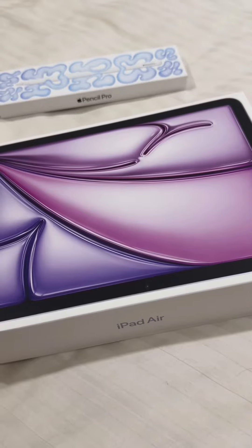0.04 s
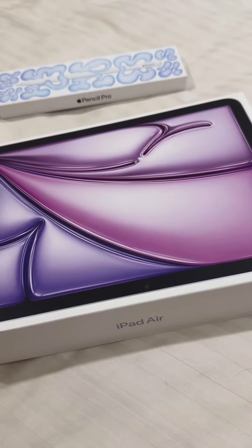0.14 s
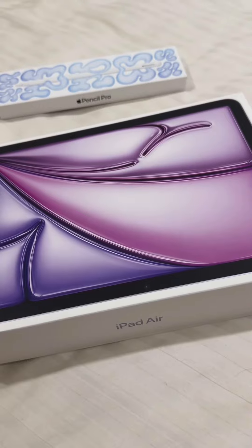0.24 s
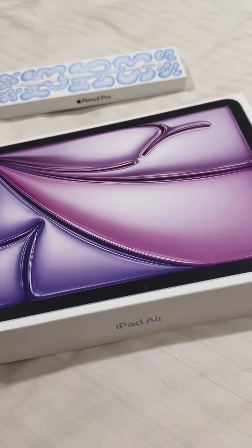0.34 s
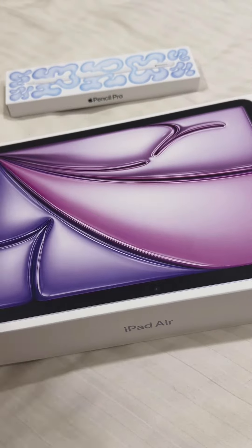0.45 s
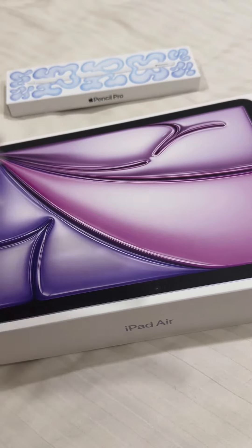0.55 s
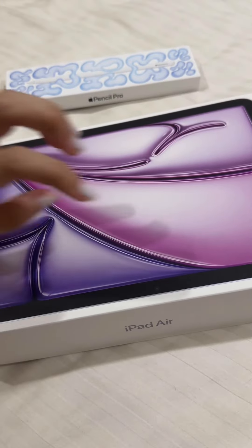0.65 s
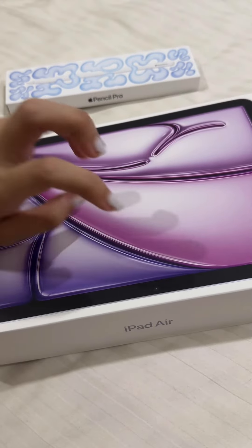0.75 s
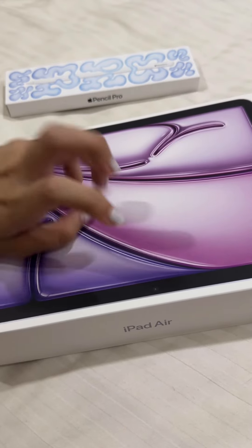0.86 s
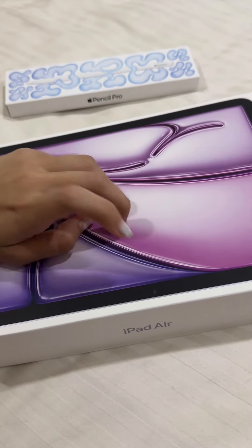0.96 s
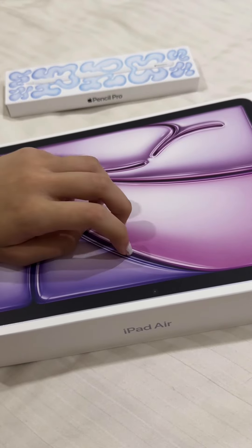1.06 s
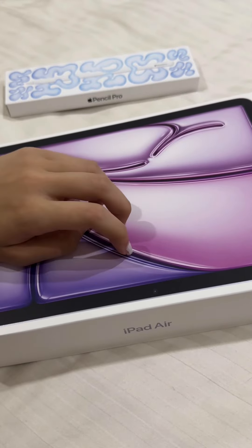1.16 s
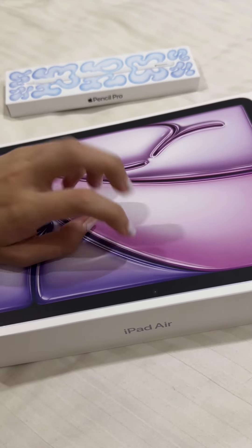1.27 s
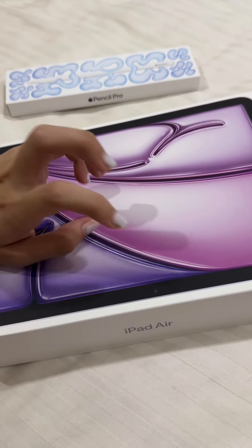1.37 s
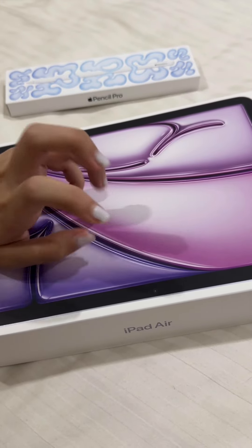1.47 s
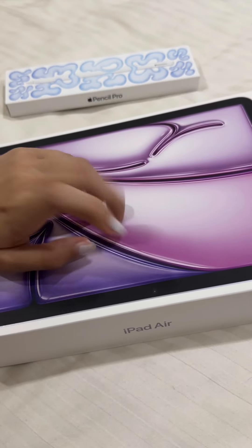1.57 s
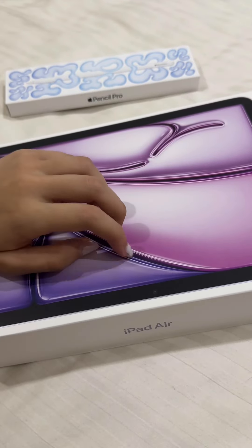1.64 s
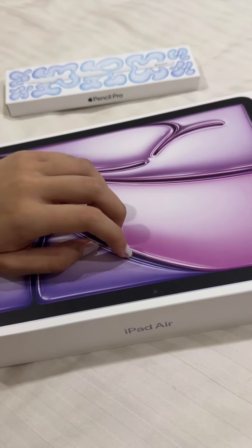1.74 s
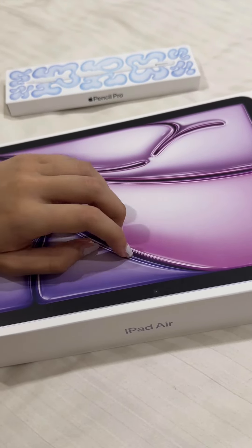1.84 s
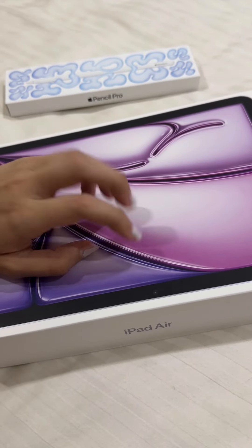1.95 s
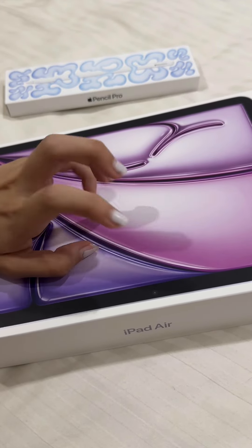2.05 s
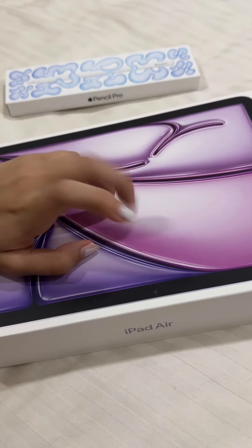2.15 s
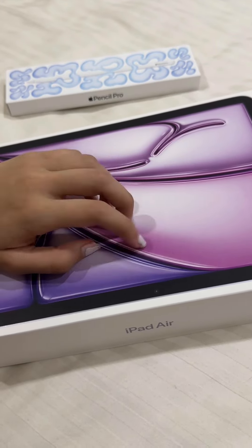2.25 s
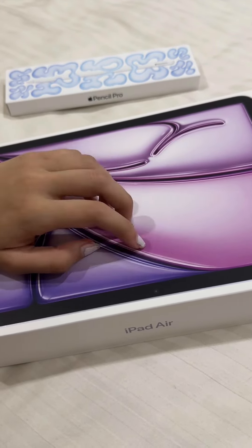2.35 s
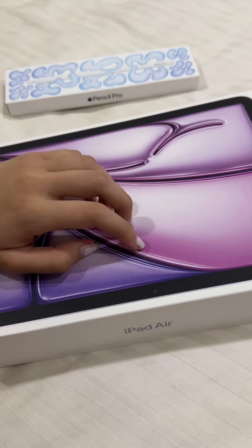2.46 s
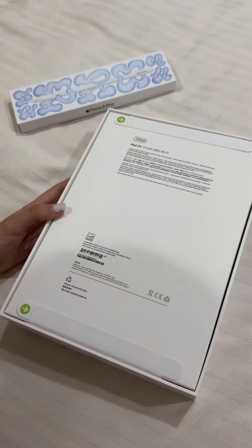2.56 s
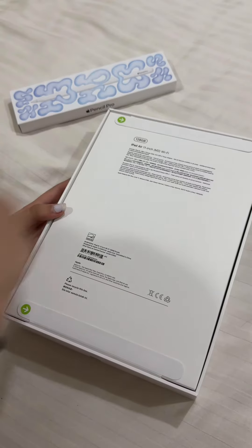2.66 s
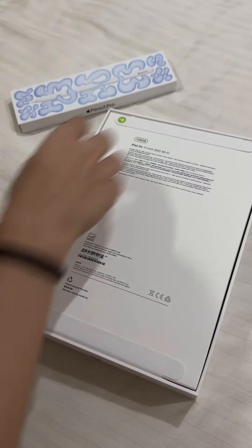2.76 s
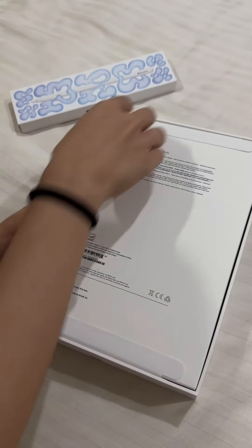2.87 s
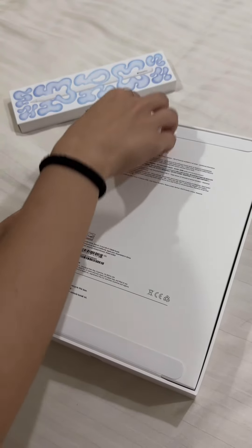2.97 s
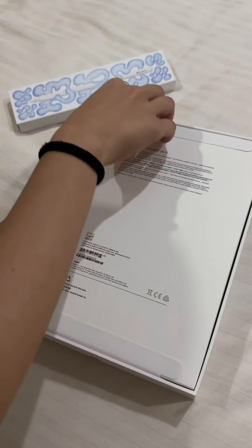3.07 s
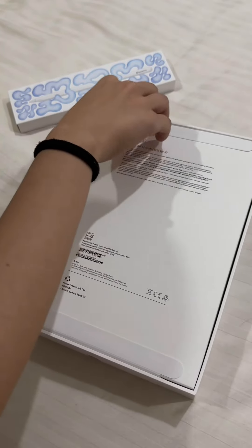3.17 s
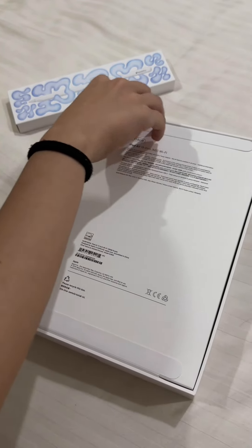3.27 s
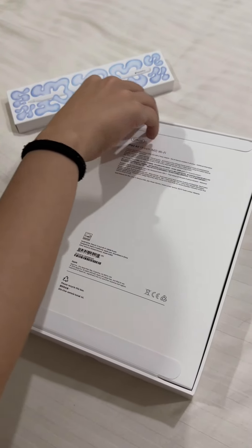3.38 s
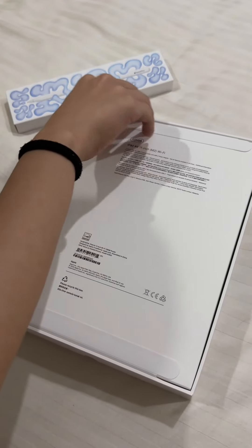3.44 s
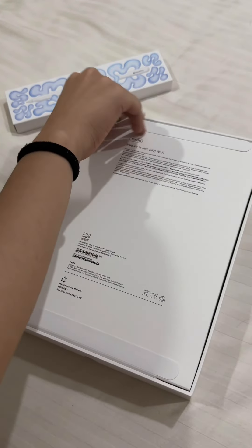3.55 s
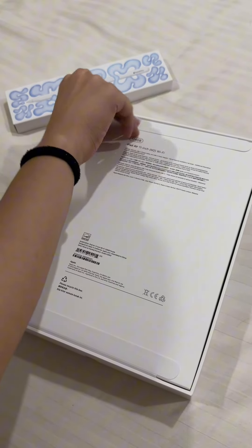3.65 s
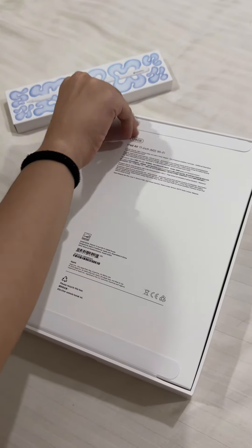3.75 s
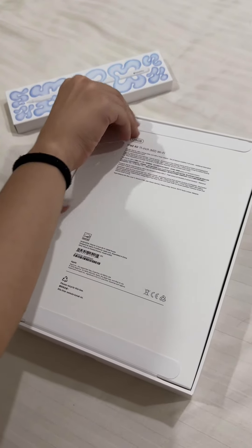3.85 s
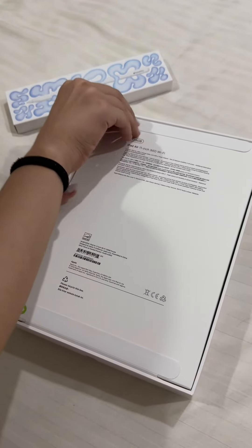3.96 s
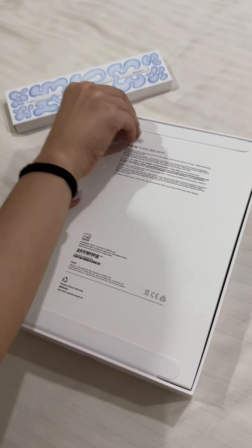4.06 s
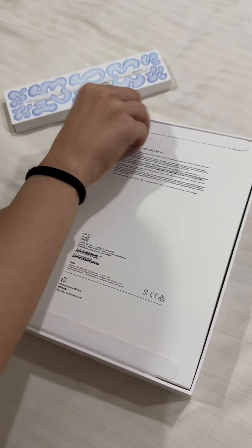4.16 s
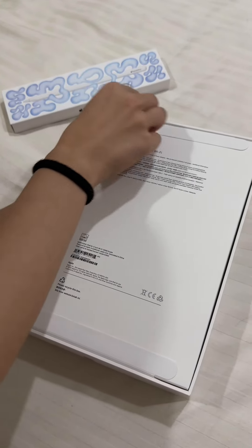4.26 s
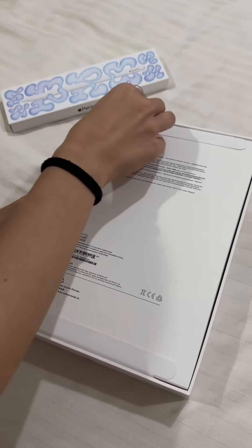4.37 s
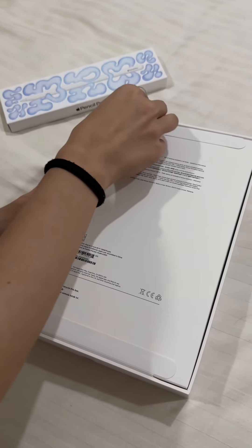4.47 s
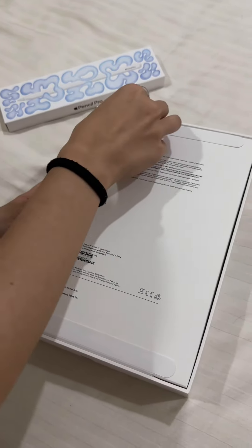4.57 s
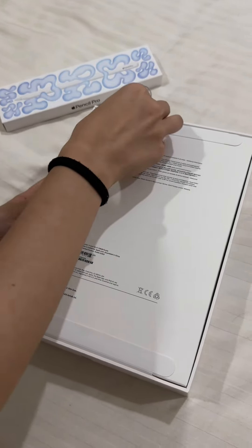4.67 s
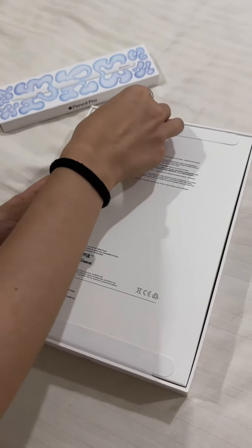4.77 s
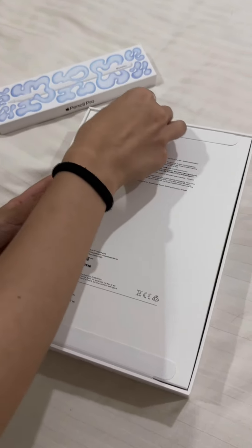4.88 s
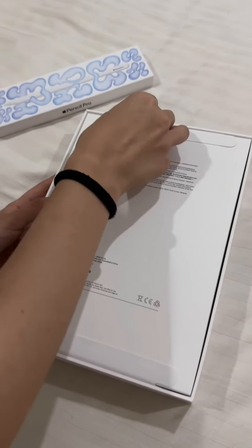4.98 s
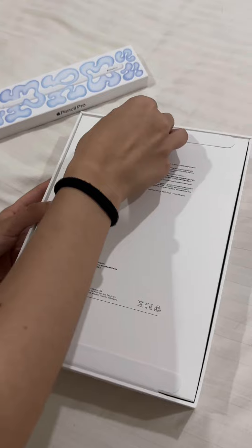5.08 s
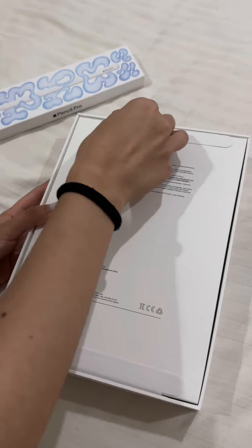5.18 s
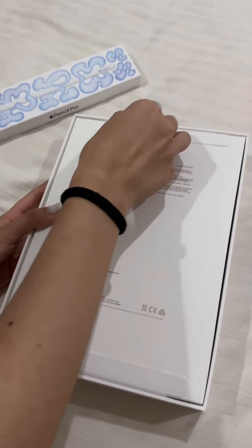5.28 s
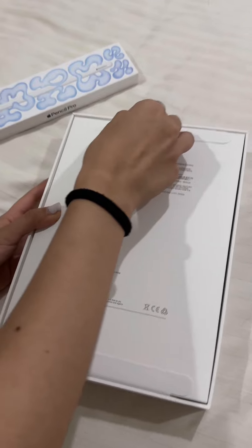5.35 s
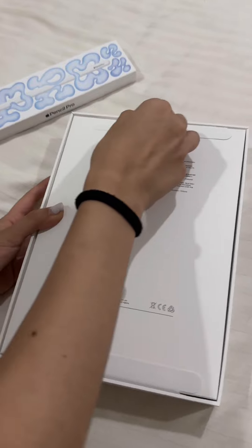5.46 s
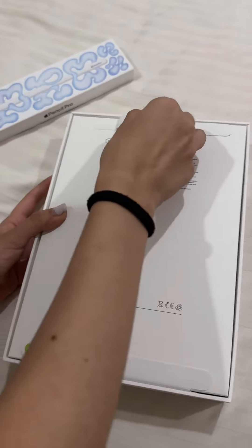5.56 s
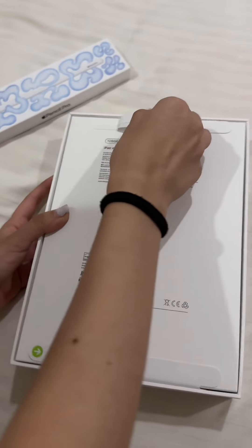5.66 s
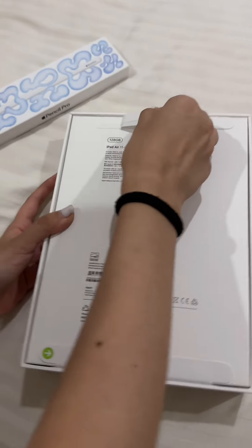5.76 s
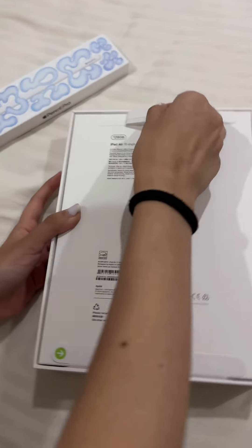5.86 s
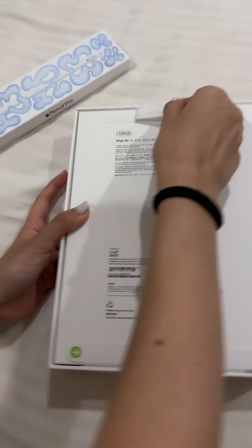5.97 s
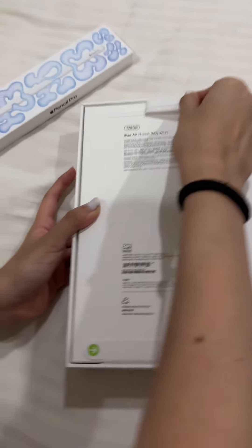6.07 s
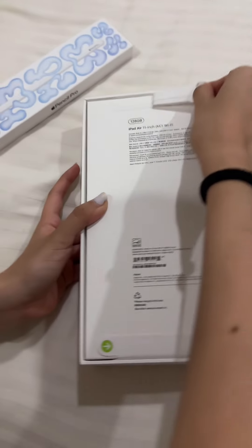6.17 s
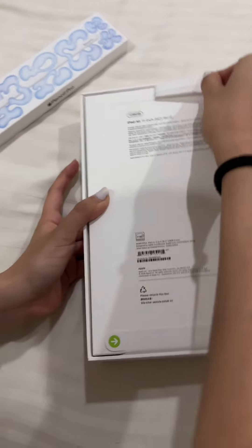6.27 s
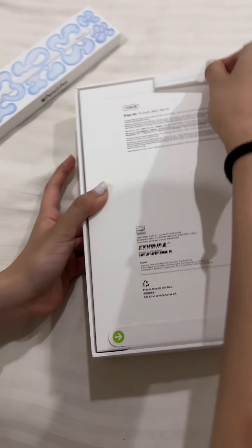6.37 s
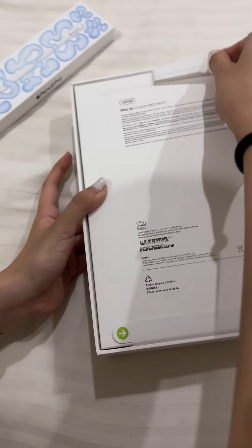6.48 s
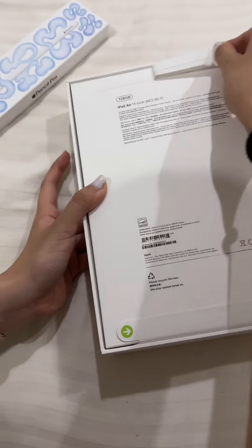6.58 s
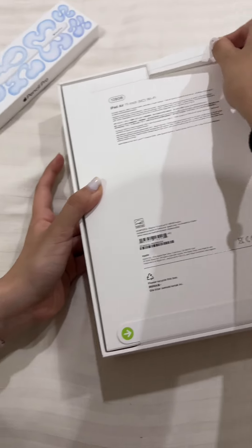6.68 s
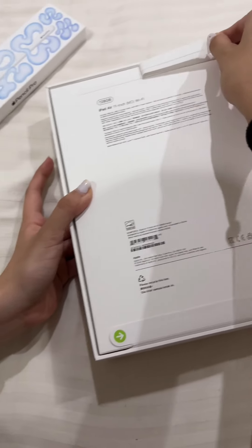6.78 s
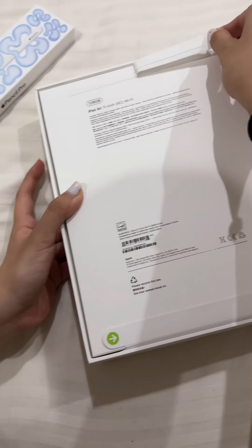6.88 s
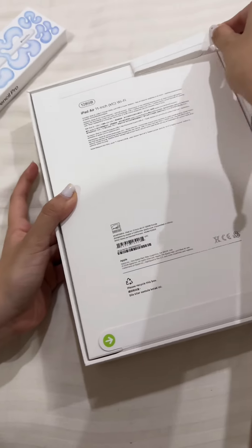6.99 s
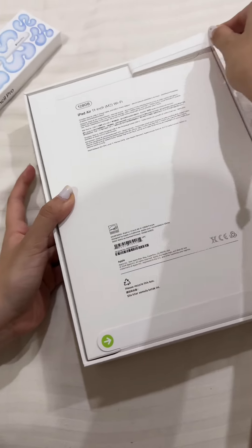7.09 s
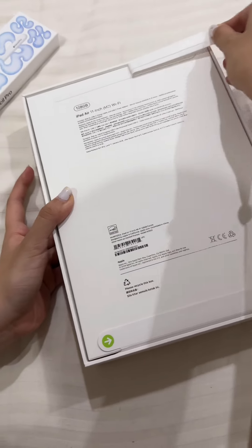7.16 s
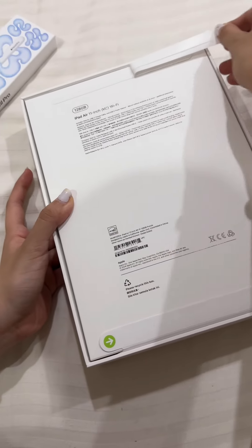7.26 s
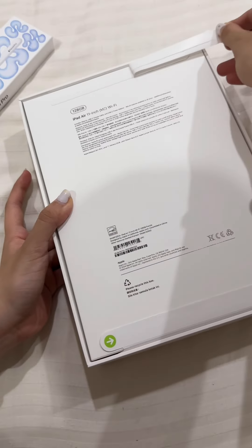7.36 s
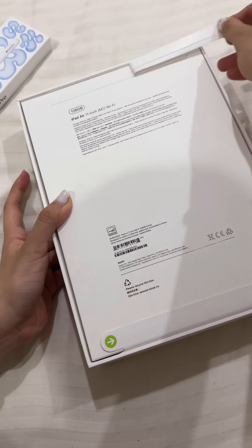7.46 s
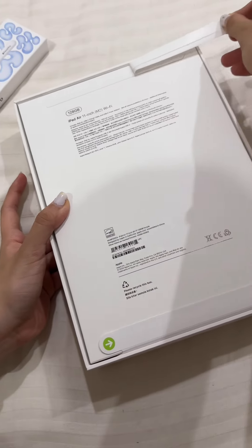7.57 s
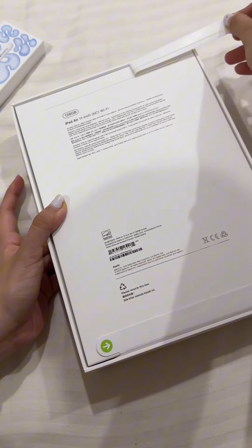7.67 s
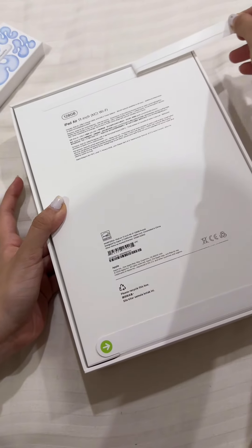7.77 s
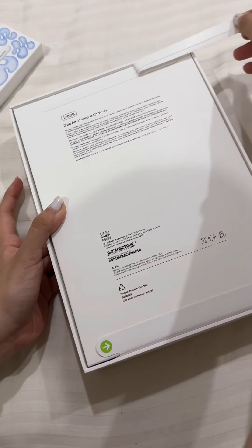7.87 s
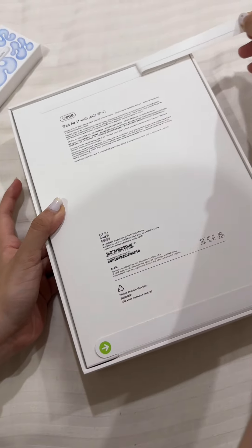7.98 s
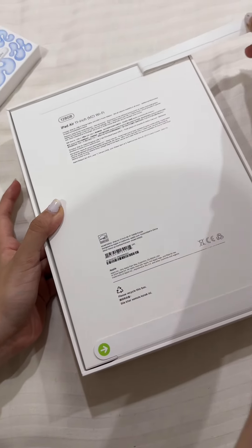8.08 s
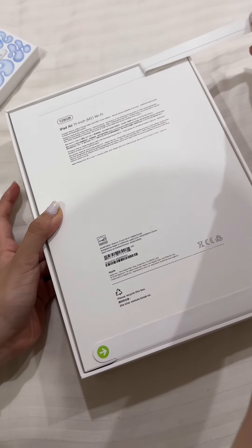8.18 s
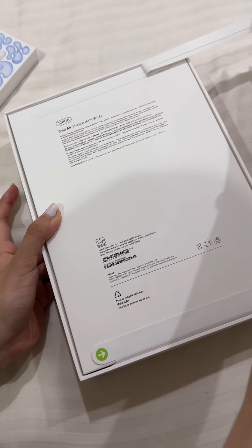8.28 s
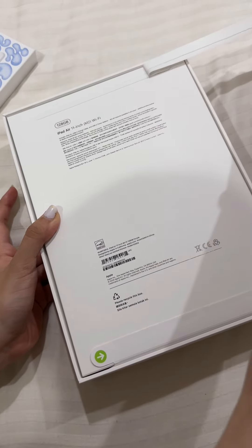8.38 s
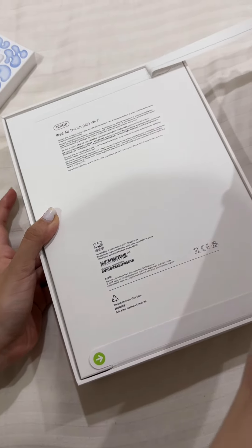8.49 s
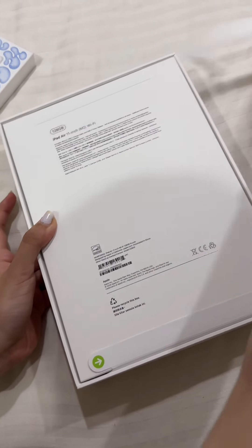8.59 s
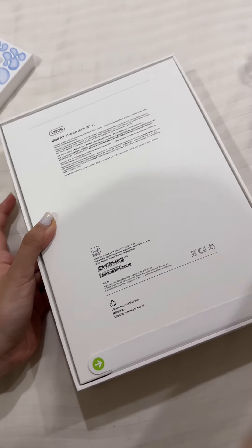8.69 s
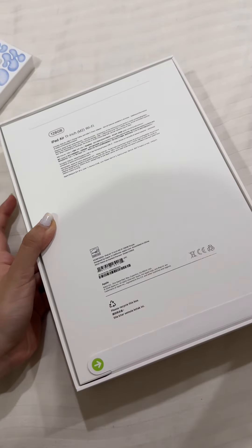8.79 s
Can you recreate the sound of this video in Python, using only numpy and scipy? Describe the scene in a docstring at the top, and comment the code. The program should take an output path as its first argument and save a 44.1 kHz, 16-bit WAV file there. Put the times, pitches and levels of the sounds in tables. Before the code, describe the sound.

Fingernails drum three quick rolls on a cardboard box in a quiet room, then a paper strip is peeled off in crackling tugs and snaps free.

```python
"""A low ventilation drone rises in a small, quiet room; bands of shaped noise and wavering tones make it.
Fingernails then drum three rolls on a cardboard box, each tap a dispersed bending wave in the lid. Light knocks
and rubs of filtered noise, some bright as hisses, follow, then a paper pull strip is peeled in tugs: random
fibre breaks crackle in uneven slips and excite the ringing of the freed paper, with soft bumps below. At last
the end of the strip snaps free in a few decaying noise bursts, and a faint bright rub follows."""
import sys
import numpy as np
from scipy import signal
from scipy.fft import rfft, irfft, next_fast_len
from scipy.io import wavfile
from scipy.ndimage import uniform_filter1d

SR = 44100
rng = np.random.default_rng(int(sys.argv[2]) if len(sys.argv) > 2 else 0)


def to_wav(s):
    """Save 16-bit WAV."""
    ch = np.atleast_2d(s).T  # columns
    pcm = np.round(np.clip(ch, -1, 1) * 32767)  # PCM
    wavfile.write(sys.argv[1], SR, pcm.astype(np.int16))


N = 389403
TIME = np.arange(N) / SR
SIZE = 4096  # samples in a short response
HZ = np.maximum(np.arange(SIZE // 2 + 1) * SR / SIZE, 1)

# Edges in Hz of the four registers of a tap: thump, knock, clack, nail tick.
TAP_EDGES_HZ = [100, 400, 1400, 6000, 16000]
# Larger fibre bundles letting go. Each row: start in seconds, peak level in dB before a common gain,
# low crack in dB (it tilts the colour).
BUNDLES = [(4.1718, -28.5, -1), (4.206, -28.5, -13), (4.226, -26, 0), (4.2838, -23, 3), (4.3563, -24, -37),
           (4.515, -34, -7), (4.569, -27, -13.5), (4.625, -30, -7), (4.658, -31, -19), (4.671, -34, -25),
           (4.7313, -31, 4), (4.778, -30, -11), (4.808, -24, 1), (4.87, -37, -6), (4.9002, -27.5, -19),
           (5.061, -34.5, -23), (5.1382, -29.5, -21), (5.215, -25.5, -20), (5.2916, -20, -9),
           (5.335, -27, -27), (5.4015, -33.5, -20), (5.465, -28, -18), (5.5494, -29, -22),
           (5.618, -24.5, -16), (5.697, -26, -24), (5.735, -28.5, -24), (5.8, -25.5, -39),
           (5.881, -28, -21), (5.89, -20, -19), (6.025, -25, -26), (6.135, -24, -21), (6.205, -24, -15.5),
           (6.358, -19, -20), (6.409, -22.5, -22.5), (6.4773, -18.5, -21), (6.55, -25.5, -9.5),
           (6.628, -26, -25.5), (6.693, -28.5, -23), (6.7303, -27, -17), (6.746, -19.5, -20),
           (6.8567, -21, -6), (6.9497, -16.5, -18), (7.0413, -24, -17), (7.146, -22, -14),
           (7.228, -25.5, -14), (7.327, -23, -31), (7.465, -16, -19.5), (7.648, -24, -29.5),
           (7.6884, -18, -30), (7.7125, -25, -25), (7.7856, -18, -29), (7.823, -19.5, -25),
           (7.849, -25, -25), (7.91, -24, -14.5), (8.1248, -24.5, -17.5), (8.2495, -21.5, -21),
           (8.4495, -19.5, -29), (8.503, -23.5, -29)]
# The strip's end tears free and slaps the box. Each row: start in seconds, level in dB,
# decay time in seconds, brightness in dB per octave.
END_BURSTS = [(8.5286, -22.5, 0.0024, -4), (8.5304, 1, 0.00084, 0), (8.5316, -13.5, 0.00194, -6.5),
              (8.5349, -10.5, 0.0011, 0.5), (8.5369, -19, 0.0042, -4.5)]
# Tugs on the strip, most with a stall after them. Each row: start and end in seconds, level in dB at the start
# and at the end, ring frequency in Hz, ring level in dB, level in dB of the ring an octave below.
TUG_ROWS = [(4.205, 4.465, -58, -58, 8500, 4.5, 1), (4.551, 4.915, -51, -47.5, 6960, 1.5, -3),
            (5.159, 5.415, -42.5, -45, 6400, 1.5, -5.5), (5.437, 5.755, -44, -49, 5760, 5.5, 0),
            (5.793, 5.948, -40, -38.5, 6640, 3.5, 3), (5.969, 6.259, -42, -40.5, 6170, 8.5, 6),
            (6.292, 6.565, -40.5, -40.5, 5960, 2, 3), (6.668, 6.935, -37, -37.5, 4550, 5, 0.5),
            (7.058, 7.248, -39, -40.5, 4570, 8.5, -3), (7.381, 8.002, -38, -34, 4460, 5.5, -3.5),
            (8.012, 8.228, -54.5, -40, 4540, 6.5, -4), (8.223, 8.532, -35, -44.5, 5560, 5.5, -2.5)]


def from_db(db):
    """Amplitude ratio: 20 dB is a factor of ten."""
    return 10 ** (np.asarray(db) / 20)


def rms_one(x):
    """Normalisation to unit root-mean-square amplitude."""
    return x / np.sqrt(np.mean(x ** 2) + 1e-20)


def in_time(rows):
    """Linear interpolation: each column of a curve at every sample."""
    s, *columns = np.transpose(rows)
    return [np.interp(TIME, s, column) for column in columns]


def at_hz(points, hz):
    """Logarithmic frequency axis: a spectrum in dB is read between its points."""
    points = np.array(points)
    return np.interp(np.log(np.maximum(hz, 1)), np.log(points[:, 0]), points[:, 1])


def add(out, s, sound):
    """Superposition: a sound is mixed in at time s."""
    i = int(s * SR)
    out[:, i:i + sound.shape[-1]] += sound[..., :N - i]


def drift(rate):
    """Slow random fluctuation: chance values, rate per second, joined by lines; rms 1."""
    knots = rng.standard_normal(4000)
    return rms_one(np.interp(TIME * rate, np.arange(len(knots)), knots))


def causal(db):
    """Minimum phase: the quickest-dying response with these levels on HZ, by folding the cepstrum."""
    cepstrum = irfft(np.log(from_db(db)))
    return np.exp(rfft(2 * cepstrum[..., :SIZE // 2], SIZE) - cepstrum[..., :1])


def ripple(count=36):
    """Local interference: broad random peaks and dips that belong to one spot on the card."""
    places = np.linspace(0, np.sqrt(HZ[-1]), count)
    return np.interp(np.sqrt(HZ), places, rng.uniform(-2, 2, count))


def two_ports(db, lead_s, uneven=1):
    """Time and level differences: each microphone has its own ripple, and the right one lags by lead_s."""
    own = np.array([ripple(), ripple()])
    levels = db + uneven * (1.3 * ripple() + 1.6 * own)
    lag_s = np.array([[0], [lead_s]])
    return causal(levels) * np.exp(-2j * np.pi * HZ * lag_s)


def steady_noise(spectrum):
    """Spatial coherence: coloured stereo noise, most alike in the two channels in the bass; rms 1."""
    # Each row: frequency in Hz, correlation of the channels from 0 to 1.
    coherence = [(25, 0.3), (60, 0.95), (130, 0.99), (380, 0.48), (950, 0.017), (2400, 0.075), (6000, 0.17),
                 (15000, 0.24)]
    size = next_fast_len(N)
    hz = np.arange(size // 2 + 1) * SR / size
    mid, side = rfft(rng.standard_normal((2, size)))
    alike = np.clip(at_hz(coherence, hz), -1, 1)
    both = np.sqrt(1 + alike) * mid + np.sqrt(1 - alike) * side * [[1], [-1]]
    return rms_one(irfft(both * from_db(at_hz(spectrum, hz)), size)[:, :N])


def hum(hz, waver_per_s=9, waver=0.73, apart=0.16):
    """Random modulation: a tone wavers in strength and phase, a little differently on each side; rms 1."""
    shared, sideways = [drift(waver_per_s) + 1j * drift(waver_per_s) for _ in range(2)]
    unsteady = 1 + waver * shared + apart * sideways * np.array([[1], [-1]])
    return rms_one(np.real(unsteady * np.exp(2j * np.pi * hz * TIME)))


def drone(rumble_db=0.0, air_db=0.5):
    """Broadband and tonal ventilation noise: rumble, soft air and two unsteady hums that swell at times."""
    # Course of the noise. Each row: time in seconds, rumble level in dB, air level in dB before the trims.
    course = [(0.428, -50, -55), (0.46, -33, -41.5), (1.6, -39, -43), (6.2, -38, -39.5),
              (8.3, -35.5, -38.5), (8.83, -38, -40.5)]
    # Spectra of the two noises. Each row: frequency in Hz, level in dB.
    rumble_spectrum = [(13, -54), (24, -40), (43, -20), (70, -3.5), (86, -7), (97, 2.5), (111, -5),
                       (129, -7), (177, -7.5), (201, -13), (260, -17.5), (340, -52), (570, -120)]
    air_spectrum = [(150, 4), (260, -0.5), (400, 3), (560, -4), (900, -4), (1400, -10.5), (2000, -16),
                    (2800, -19.5), (4000, -30), (7000, -34), (10000, -41.5), (11500, -52.5), (14500, -41)]
    # Wavering hums. Each row: frequency in Hz, level in dB.
    hum_tones = [(99, -40), (174, -53)]
    # Swells of a hum. Each row: centre in seconds, half length in seconds, frequency in Hz, level in dB.
    swell_rows = [(6.464, 0.12, 172, -35.5), (7.478, 0.23, 100.4, -25.5), (8.238, 0.27, 174.7, -34.5)]
    hum_start_s, hum_rise_s = 0.424, 0.048
    low_db, mid_db = in_time(course)
    out = from_db(low_db + rumble_db) * steady_noise(rumble_spectrum)
    out = out + from_db(mid_db + air_db) * steady_noise(air_spectrum)
    running = np.clip((TIME - hum_start_s) / hum_rise_s, 0, 1)
    for hz, level_db in hum_tones:
        out = out + running * from_db(level_db) * hum(hz)
    for s, half_s, hz, level_db in swell_rows:
        swell = np.exp(-((TIME - s) / half_s) ** 2)
        out = out + from_db(level_db) * swell * hum(hz)
    return out


def room(x, colour_db, gap_s=0.0013, build_s=0.0024, count=3):
    """Reverberation: diffuse reflections die exponentially band by band, different at each microphone."""
    # Each row: frequency in Hz, time in seconds to fall by 60 dB.
    decay_times = [(150, 0.17), (500, 0.51), (1400, 0.28), (3700, 0.45), (9700, 0.3), (16000, 0.11)]
    move_s = 0.045  # the hands move, so the pattern of reflections changes this often
    t, tails = TIME[:SR // 2], 0
    edges = np.geomspace(70, 18000, 13)
    for low, high in zip(edges, edges[1:]):
        hz = np.sqrt(low * high)
        band = signal.butter(2, [low, high], "band", fs=SR, output="sos")
        noise = signal.sosfilt(band, rng.standard_normal((count, 2, len(t))))
        decay = from_db(-60 * t / at_hz(decay_times, hz)) * np.clip((t - gap_s) / build_s, 0, 1)
        tails = tails + noise * decay / np.sqrt(np.sum(decay ** 2)) * from_db(at_hz(colour_db, hz))
    place = (TIME / move_s).astype(int) % count
    out = 0
    for k, tail in enumerate(tails):
        share = uniform_filter1d(1. * (place == k), size=200)
        out = out + signal.oaconvolve(x * share, tail, axes=1)[:, :N]
    return out


def handling(bump_hz=56, bump_s=0.0079, bump_skew=0.57):
    """Filtered noise and damped oscillation: rubs, some bright as hisses; the box thuds softly on the bedding."""
    # Rubs of skin on card, some of them bright as hisses (2.531, 3.509 and 8.659 s). Each row: start in
    # seconds, time in seconds until the fade, level in dB, brightness in dB per octave.
    hiss_rows = [(1.823, 0.044, -45.5, -1.5), (2.531, 0.09, -51, 13.5), (2.882, 0.095, -37.5, -5.5),
                 (3.192, 0.19, -48, -5), (3.509, 0.14, -68.5, 9), (3.715, 0.047, -47, -4.5),
                 (3.822, 0.025, -45.5, -2), (3.971, 0.039, -43.5, -5.5), (8.659, 0.13, -46, 22)]
    # The held box bumps on the bedding. Each row: start in seconds, level in dB.
    bump_rows = [(5.791, -23.5), (6.438, -27), (7.328, -32), (7.681, -21), (7.791, -26.5), (8.112, -20.5),
                 (8.42, -18)]
    out, t = np.zeros((2, N)), TIME[:2 * SIZE]
    # common spectrum of these noises before the tilt: frequency in Hz, level in dB
    hiss_spectrum = [(120, -55.0), (250, 15.0), (700, 6.5), (2500, 6.0), (4500, -3.0), (8500, -5),
                     (11500, -27), (15000, -36), (17000, -38)]
    for s, length_s, level_db, tilt_db in hiss_rows:
        tilt = tilt_db * np.log2(np.maximum(HZ, hiss_spectrum[0][0]))
        colour = irfft(causal(at_hz(hiss_spectrum, HZ) + tilt))
        noise = rng.standard_normal((2, len(t)))
        hiss = rms_one(signal.oaconvolve(noise, [colour], axes=1)[:, :len(t)])
        envelope = np.clip(np.minimum(t / 0.0074, 1 + (length_s - t) / 0.041), 0, 1)
        add(out, s, hiss * from_db(level_db) * envelope)
    swing = np.sin(2 * np.pi * bump_hz * t + bump_skew * np.array([[1], [-1]]))
    thud = swing * t / bump_s * np.exp(1 - t / bump_s)
    for s, level_db in bump_rows:
        add(out, s, from_db(level_db) * thud)
    return out


def contacts():
    """Excitation of the box: each touch as (s, dB per register, spot), a finger's colour at its own strength."""
    # Three rolls, finger after finger. Each row: start in seconds, strength in dB, brightness in dB per octave,
    # extra clack in dB, then the spot: low resonance, high resonance and node in Hz.
    roll_rows = [(0.818, 3.5, 0.5, 1, 950, 1890, 2830), (0.856, 5, 2.5, -1, 670, 2300, 540),
                 (0.915, 2, 0, -5, 1020, 2750, 830), (0.976, 3.5, -0.5, -2.5, 900, 2700, 610),
                 (1.408, -3.5, 1, -2, 1100, 2180, 645), (1.491, 1, -0.2, 5.5, 830, 2500, 530),
                 (1.529, 1, 1, -1, 640, 2050, 2500), (1.571, 3, 0.5, -3.5, 860, 2300, 1300),
                 (2.028, 0.5, 0, -2, 1200, 2140, 700), (2.100, -1.5, -2, 6, 680, 2400, 530),
                 (2.138, 0, -0.5, 2.5, 660, 3000, 870), (2.183, 2, -0.4, -3, 880, 2440, 1350)]
    # The four fingers in landing order. Each row: thump, knock, clack and nail tick in dB before the tap trims.
    finger_rows = [(-29, -39.5, -36.5, -35.5), (-16, -25, -40, -37), (-8.5, -15, -25.5, -21),
                   (-19.5, -17.5, -28.5, -21.5)]
    # Light knocks as the hand turns the box, feels for the tab and lifts it. Each row: start in seconds,
    # strength in dB, brightness in dB per octave, extra clack in dB.
    knock_rows = [(2.400, -10, -4, 16), (2.882, -2.5, 1, 6), (2.900, 2, 3, 0), (2.926, -3, -1.5, -9),
                  (2.953, 2.5, 4, -2), (3.831, -1, 4, -6), (3.871, -0.5, 2, 3.5), (3.999, -4, -0.5, 1),
                  (4.225, 0, 0.5, 4), (4.284, -1.5, -1.5, 9), (4.808, -3, 1.5, -1)]
    # The gripping hand: thump, knock, clack and nail tick in dB before the tap trims.
    grip_db = (-35, -37.5, -45.5, -58)
    # The stiff edge under that hand: low resonance, high resonance and node in Hz.
    grip_edge = (710, 6400, 2590)
    tilt_pivot_hz = 1500
    edges = np.array(TAP_EDGES_HZ)
    octaves = np.log2(np.sqrt(edges[1:] * edges[:-1]) / tilt_pivot_hz)
    touches = [(row[:4], finger_rows[k % len(finger_rows)], row[4:]) for k, row in enumerate(roll_rows)]
    touches += [(row, grip_db, grip_edge) for row in knock_rows]
    out = []
    for (s, strength_db, tilt_db, clack_db), hand_db, spot in touches:
        extra_db = np.array([0, 0, clack_db, 0])
        out.append((s, hand_db + tilt_db * octaves + strength_db + extra_db, spot))
    return out


def taps(band_db=(-2., -3., -1., -1.), contact_s=0.0073, left_db=2.0):
    """Dispersion: bending waves run slower the lower they are, so each tap sweeps from tick down to thump."""
    # The box under a nail. Each row: frequency in Hz, level in dB.
    box_spectrum = [(50, -22), (110, -6.5), (168, 4.5), (290, 0), (480, -5.5), (680, -6.5), (950, -7),
                    (1500, -11), (2650, -11.5), (3400, -21), (4600, -19.5), (6300, -21), (7700, -16),
                    (9000, -21), (11500, -33), (13500, -32.5), (15300, -30.5), (16500, -42)]
    # What a spot does at its low resonance, its high resonance and its node: level in dB.
    spot_levels = (6, 7.5, -12)
    # Widths of those three in octaves.
    spot_widths = (0.27, 0.41, 0.18)
    out, edges, t = np.zeros((2, N)), np.array(TAP_EDGES_HZ), TIME[:SIZE]
    box_db = at_hz(box_spectrum, HZ)
    # the box's own level in each register, as power over the contact time
    own_db = []
    for low, high in zip(edges, edges[1:]):
        gain = from_db(box_db[(HZ >= low) & (HZ < high)])
        own_db.append(10 * np.log10(2 * np.sum(gain ** 2) / SIZE / (contact_s * SR)))
    own_db = np.array(own_db)
    # the time a 1 kHz wave takes to the edge nearest each microphone
    travel_s = np.array([[.00228], [.00234]])
    bending = np.exp(-4j * np.pi * travel_s * np.sqrt(1000 * HZ))
    short_waves = np.clip(HZ / 900, 0, 1)  # only these feel the unevenness in full
    # the lid radiates more to the left: left minus right in dB
    aim = [(200, 0.5), (600, left_db), (900, left_db), (1300, 1.5), (4500, 3.5), (8000, 2.0)]
    aim_db = at_hz(aim, HZ) * np.array([[.5], [-.5]])
    # waves in the middle range bounce between the edges for a few milliseconds
    bounce = .08 * from_db(at_hz([(200, -14), (900, -2), (3500, 2), (8000, -7), (14000, -10)], HZ))
    centres = np.log(edges[1:] * edges[:-1]) / 2
    for s, levels, spot in contacts():
        touch_db = np.interp(np.log(HZ), centres, levels - own_db + band_db)
        for hz, spot_db, width in zip(spot, spot_levels, spot_widths):
            touch_db = touch_db + spot_db * np.exp(-(np.log2(HZ / hz) / width) ** 2)
        echoes = 1 + bounce * rfft(rng.standard_normal((2, SIZE)) * np.exp(-t / .002))
        response = two_ports(box_db + touch_db + aim_db, 0, short_waves)
        add(out, s, irfft(response * bending * echoes)[:, :SIZE // 2])
    return out


def cancellations(x):
    """Destructive interference: waves from different parts of the lid cancel in dips at each microphone."""
    # Each row: left dip in Hz, right dip in Hz, depth in dB (negative).
    dip_rows = [(1483, 1650, -18), (3424, 3000, -1), (6200, 2100, -8)]
    width_octaves = 0.084
    dips_db = 0
    for left, right, depth_db in dip_rows:
        octaves = np.log2(HZ / np.array([[left], [right]]))
        dips_db = dips_db + depth_db * np.exp(-(octaves / width_octaves) ** 2)
    return signal.oaconvolve(x, irfft(causal(dips_db)), axes=1)[:, :N]


def paper_click(tilt_db=0):
    """Impulse response: one fibre break cracks and scatters through the strip, left of centre; energy 1."""
    # The strip's colour. Each row: frequency in Hz, level in dB.
    paper_spectrum = [(300, -25), (650, 3), (1000, -11), (1550, -0.5), (2100, -6.5), (2950, -7.5),
                      (3700, -6), (4500, -8), (5500, -5.5), (6900, 4.5), (8000, -5), (9500, -7),
                      (11200, -15), (14000, -11.5), (15600, -9.5), (16300, -38.5)]
    t = TIME[:SIZE]
    crack = (t == 0) + .26 * rng.standard_normal(SIZE) * np.exp(-t / .0005)
    lead_s = rng.normal(.000202, .000012)
    response = two_ports(at_hz(paper_spectrum, HZ) + tilt_db, lead_s)
    click = irfft(response * rfft(crack))[:, :SIZE // 8]
    return click / np.sqrt(np.sum(click ** 2) / 2)


def tug_shape(start, end):
    """Attack and exponential release: a tug sets in, holds and dies away."""
    attack_s, release_s = 0.024, 0.027
    return np.clip((TIME - start) / attack_s, 0, 1) * np.exp(-np.clip((TIME - end) / release_s, 0, 20))


def effort(freed):
    """Addition of powers: level of the pull in dB, the tugs over a faint creep."""
    creep_db, creep_growth_db = -60, 14.5  # fibres still part between tugs, more so on a long strip
    power = from_db(creep_db + creep_growth_db * freed) ** 2
    for start, end, first_db, last_db, *_ in TUG_ROWS:
        level_db = np.interp(TIME, [start, end], [first_db, last_db])
        power = power + (tug_shape(start, end) * from_db(level_db)) ** 2
    return 10 * np.log10(power)


def tearing(uneven_db=2.0, uneven_per_s=28, count=12):
    """Stick-slip: each slip of the strip breaks a shower of fibres at a spot with its own colour."""
    # Sparse ticks, then a running crackle. Each row: time in seconds, fibre breaks per second,
    # strain that stays between slips.
    break_rows = [(4.1, 1000, 0.2), (5.0, 2200, 0.2), (5.9, 4400, 0.23), (8.5, 3600, 0.2)]
    # How much of the strip acts as hanging free. Each row: time in seconds, share from 0 to 1.
    freed_rows = [(4.1, 0.49), (5.95, 0), (6.45, 0.77), (7.1, 0.82), (8.5, 1)]
    # Crackle, box resonance, strip ring, fine fizz. Each row: level in dB at a free share of 0,
    # change in dB at a share of 1.
    register_rows = [(0, -1.5), (-7, 1), (-22, 11), (-6.5, -2.5)]
    # Bands of these four registers. Each row: lower and upper edge in Hz.
    register_bands = [(5300, 11500), (550, 4200), (4250, 5150), (11500, 17000)]
    slips_per_s, slip_spread_db, slip_decay_s = 150, 2, 0.00071
    fibre_spread_db = 6.5  # fibre sizes scatter by this, capped at the stout end
    take_up_s = 0.058  # the first pull takes up the slack
    # the strip lifts clear of the lid and sounds the box less
    clear_s, clear_takes_s, clear_loss_db = 7.35, 0.32, 6

    per_s, hold = in_time(break_rows)
    freed, = in_time(freed_rows)
    slip_at = (np.cumsum(rng.exponential(1, 3000)) / slips_per_s * SR).astype(int)
    slip_at = slip_at[slip_at < N]
    slips = np.zeros(N)
    slips[slip_at] = from_db(slip_spread_db * np.clip(rng.standard_normal(len(slip_at)), -2, 1.1))
    relax = np.exp(-1 / (slip_decay_s * SR))
    strain = hold + signal.lfilter([1], [1, -relax], slips + 1e-18)

    sizes = from_db(fibre_spread_db * np.minimum(rng.standard_normal(N), 1)) * rng.choice([-1, 1], N)
    breaks = strain * sizes * (rng.random(N) < per_s / SR)
    spot = rng.integers(0, count, N)[np.cumsum(slips > 0)]
    crackle = 0
    for k in range(count):
        crackle = crackle + signal.oaconvolve([breaks * (spot == k)], paper_click(), axes=1)[:, :N]

    # the free length of the strip and its contact with the lid share out the sound among the registers
    shares_db = [short_db + change_db * freed for short_db, change_db in register_rows]
    shares_db[1] = shares_db[1] - clear_loss_db * np.clip((TIME - clear_s) / clear_takes_s, 0, 1)
    pull_db = effort(freed) + uneven_db * drift(uneven_per_s)
    out = 0
    for band, share_db in zip(register_bands, shares_db):
        sos = signal.butter(2, band, "band", fs=SR, output="sos")
        part = signal.sosfiltfilt(sos, crackle + 1e-18)
        # the slow level is evened out, then set by the pull
        power = uniform_filter1d(np.mean(part ** 2, axis=0), size=2600)
        out = out + part / np.sqrt(np.abs(power) + 1e-12) * from_db(pull_db + share_db)
    begin = (TIME - BUNDLES[0][0]) / take_up_s
    finish = (END_BURSTS[-1][0] - TIME) / 0.0082
    return out * np.clip(np.minimum(begin, finish), 0, 1)


def snaps(gain_db=13.0, usual_low_db=-19.0, low_share=0.69, top_share=0.212,
          gap_s=.001, loss_db=2.5, count=6):
    """Cascading fracture: a bundle cracks, weaker breaks follow at once, and some also sound the box below."""
    out = np.zeros((2, N))
    for s, peak_db, low_db in BUNDLES:
        excess_db = low_db - usual_low_db
        tilt = [(2500, low_share * excess_db), (5000, 0), (14000, -top_share * excess_db + 4.0)]
        tilt_db = at_hz(tilt, HZ)
        for k in range(count):
            delay_s = k * gap_s * rng.uniform(.7, 1.3)
            add(out, s + delay_s, from_db(peak_db + gain_db - k * loss_db) * paper_click(tilt_db))
    return out


def taut_strip(x):
    """Resonance: the taut free paper rings at a pitch of its own in each tug, and also an octave below."""
    ring_q = 6.6  # sharpness of the ring
    out = x
    for start, end, _, _, hz, ring_db, below_db in TUG_ROWS:
        pulled = x * tug_shape(start, end) + 1e-18
        for mode_hz, mode_db in ((hz, ring_db), (hz / 2, below_db)):
            ring = signal.lfilter(*signal.iirpeak(mode_hz, ring_q, fs=SR), pulled)
            out = out + (from_db(mode_db) - 1) * ring
    return out


def release(lead_s=0.00026, uneven=0.53):
    """Sudden release of tension: the last glued patch rips in a few short, decaying noise bursts."""
    # Colour of the slap. Each row: frequency in Hz, level in dB.
    slap_spectrum = [(90, -24), (240, 9.5), (450, -2.5), (750, 8.5), (1150, -5.5), (1750, 11), (2900, -6),
                     (4100, 3.5), (5500, -1), (9000, 2.5), (11300, -12), (14000, -6.5), (16000, -20)]
    out = np.zeros((2, N))
    for s, level_db, decay_s, tilt_db in END_BURSTS:
        colour = two_ports(at_hz(slap_spectrum, HZ) + tilt_db * np.log2(HZ), lead_s, uneven)
        colour = colour / np.sqrt(np.mean(abs(colour) ** 2))
        burst = rng.standard_normal(SIZE) * np.exp(-TIME[:SIZE] / decay_s)
        add(out, s, from_db(level_db) * irfft(rfft(burst) * colour))
    return out


def microphones(x):
    """All-pass phase shift: the top treble is shared by both channels, turning phase at one pitch."""
    # Extra level of the right port. Each row: frequency in Hz, level in dB.
    right_extra = [(4500, 0.5), (6900, -3.5), (8200, -0.5)]
    join_hz, turn_hz, turn_width_hz = 8000, 11000, 2200
    size = next_fast_len(N + SIZE)
    hz = np.arange(size // 2 + 1) * SR / size
    left, right = rfft(x, size)
    joined = np.clip((hz - join_hz) / 600 + .5, 0, 1)
    turned = left * np.exp(2j * np.arctan2(hz * turn_width_hz, turn_hz ** 2 - hz ** 2))
    right = np.sqrt(1 - joined) * right + np.sqrt(joined) * turned
    return irfft(np.array([left, right * from_db(at_hz(right_extra, hz))]), size)[:, :N]


def scene():
    """Direct and reverberant sound: the box and the strip with their reflections, over the drone."""
    lid, paper, snap = taps(), taut_strip(tearing() + snaps()), release()
    # colours of the reflections: frequency in Hz, level in dB
    lid_colour = [(170, -12), (700, -16.5), (1400, -10), (2600, -13), (4000, -5.5), (6000, -9.5),
                  (8500, -19.5), (14000, -14.0)]
    paper_colour = [(300, -4.0), (3000, -3.5), (7000, -6.5), (14000, -2.0)]
    snap_colour = [(300, -6.5), (700, -8), (2000, -18), (6000, -8.5), (14000, -17)]
    box = cancellations(lid) + room(lid, lid_colour)
    strip = paper + room(paper, paper_colour)
    end = snap + room(snap, snap_colour, count=1)
    return box + end + strip * from_db([[.4], [-.4]]) + handling() + drone()


def record(dry):
    """Limiting and low-pass filtering: peaks beyond full scale are clipped and the top is cut."""
    cutoff_hz = 17000  # from here up the level is at least 60 dB down
    low_pass = signal.cheby2(14, 60, cutoff_hz, fs=SR, output="sos")
    return signal.sosfilt(low_pass, np.clip(microphones(dry), -1, 1))


dry = scene()
out = record(dry)
to_wav(out)
```